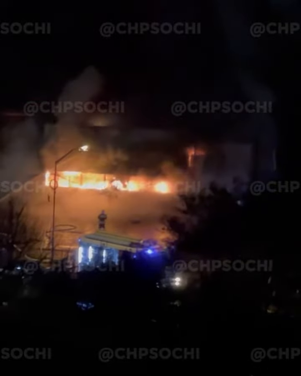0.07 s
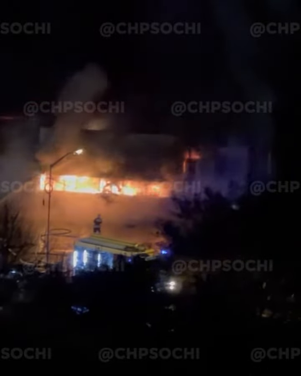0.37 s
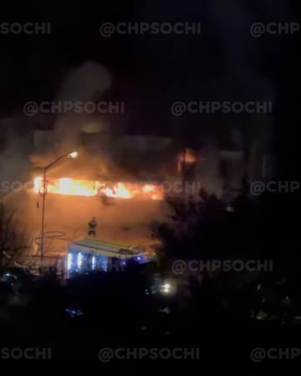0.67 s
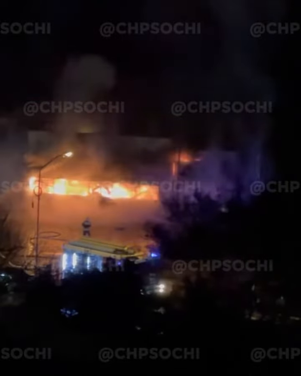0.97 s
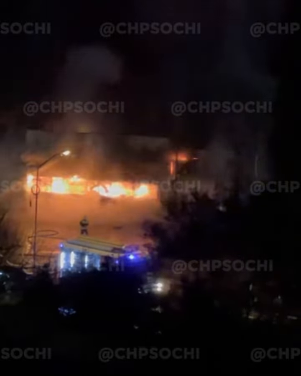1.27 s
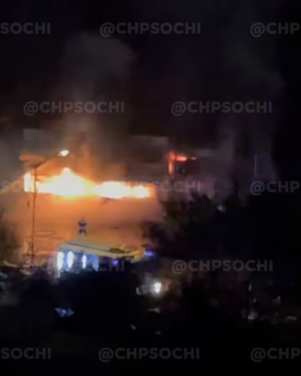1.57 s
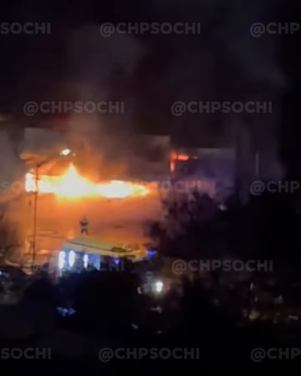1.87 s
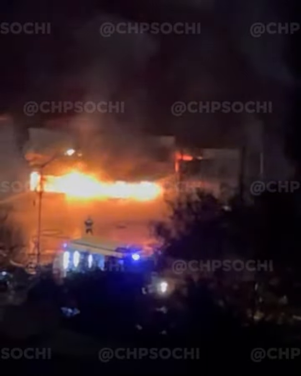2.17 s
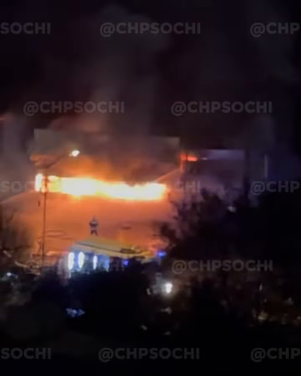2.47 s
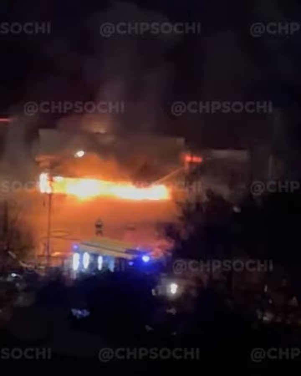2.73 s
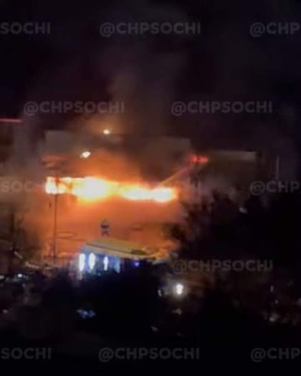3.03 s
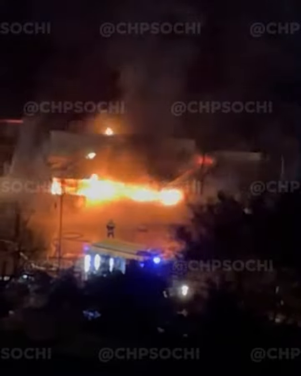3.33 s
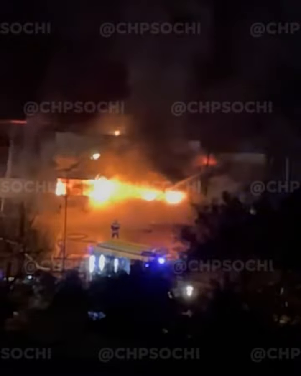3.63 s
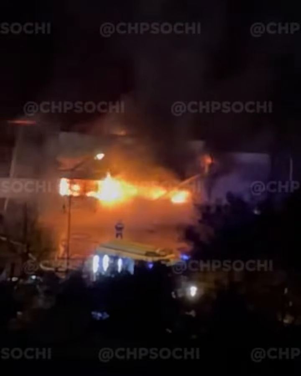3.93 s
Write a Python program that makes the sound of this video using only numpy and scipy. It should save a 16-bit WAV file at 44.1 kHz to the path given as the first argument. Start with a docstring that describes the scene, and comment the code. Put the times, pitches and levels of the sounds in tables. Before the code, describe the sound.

A building fire roars dully throughout, some way off outdoors, with hiss and faint crackle over idling fire engines and a generator's low drone. From about 0.3 to 1.5 seconds, debris snaps among brief rustles, small squeaks and soft hollow knocks. At about 2.6 seconds comes one heavy thump, like a vehicle door, leaving a short low echo. A few faint ticks follow as the roar continues.

```python
"""A building fire at night

Some way off, flames make a dull broadband roar with hiss and faint crackle on top. Two fire engines
idle at nearly the same speed, so their exhaust notes beat; a generator drones beneath them. Debris
snaps, and a few rustles, squeaks and hollow knocks sound, mostly early on. One heavy thump, like a
vehicle door, rings a panel and is reflected by the buildings as a rumble."""
import sys
import numpy as np
from scipy import signal
from scipy.fft import rfft, irfft, next_fast_len
from scipy.io import wavfile
from scipy.ndimage import uniform_filter1d, map_coordinates

SR = 44100
rng = np.random.default_rng(int(sys.argv[2]) if len(sys.argv) > 2 else 0)


def unload_audio(sound):
    """Save the sound as a 16-bit wav file, at the path given as the first command line argument."""
    columns = np.transpose(np.atleast_2d(sound))
    # keep every value between -1 and 1, then stretch to whole-number steps
    steps = np.round(np.clip(columns, -1, 1) * 32767)
    wavfile.write(sys.argv[1], SR, steps.astype(np.int16))


N = 176400

# spectra of the flames' roar and hiss (frequency [Hz], relative density [dB])
ROAR_SPECTRUM = [(150, -17), (300, -3.5), (470, -1.5), (650, 1), (850, -.5), (1150, -3.5), (1600, -4),
                 (2100, -14.5), (3500, -25), (8000, -61.5), (10000, -77)]
HISS_SPECTRUM = [(900, -22.5), (1700, -1.5), (2250, -0.5), (2750, 1.5), (3350, -1.5), (3900, -6),
                 (4900, -10.5), (5400, -10), (6300, -13), (7400, -18), (8200, -31.5), (9500, -32.5)]


def amp(db):
    """Amplitude ratio of a level in decibels."""
    return 10 ** (np.asarray(db) / 20)


def unit(x):
    """Normalisation to rms 1."""
    return x / np.sqrt(np.mean(x ** 2) + 1e-20)


def along(points, hz):
    """Interpolation of (frequency [Hz], value) points on a logarithmic axis."""
    frequencies, values = np.transpose(points)
    return np.interp(np.log(hz + 1), np.log(frequencies + 1), values)


def since(onset):
    """Seconds elapsed since an onset, zero before it."""
    return np.maximum(np.arange(N) / SR - onset, 0)


def curve(rows):
    """Linear interpolation of (time [s], value) rows at every sample."""
    return np.interp(since(0), *np.transpose(rows))


def wobble(rate):
    """Smooth random modulation: a spline through `rate` Gaussian values a second."""
    return map_coordinates(rng.standard_normal(int(N * rate / SR) + 4), [since(0) * rate + 1])


def filtered(x, response):
    """Linear filtering: the spectrum of x is multiplied by a frequency response."""
    size = next_fast_len(N + SR // 2)
    return irfft(rfft(x, size) * response(np.fft.rfftfreq(size, 1 / SR)), size)[..., :N]


def coloured(x, spectrum, tilt=0):
    """Spectral shaping, with an added tilt in dB per octave."""
    return filtered(x, lambda hz: amp(along(spectrum, hz) + tilt * np.log2((hz + 50) / SR)))


def noise(spectrum, tilt=0):
    """Coloured Gaussian noise of rms 1."""
    return unit(coloured(rng.standard_normal(N), spectrum, tilt))


def rush(spectrum, patchy_db):
    """Mid-side stereo noise, modulated in random patches of time and frequency."""
    # stereo width (frequency [Hz], side level over mid [dB])
    width = [(60, -53.5), (120, -64), (300, -32), (500, -13), (900, -9), (1500, -13), (2100, -29.5),
             (4000, -34.5), (4750, 2), (5300, -13.5), (6200, -7.5), (7000, -28), (8000, 22.5)]
    cells = signal.stft(rng.standard_normal((2, N)), nperseg=512)[2]
    patches = uniform_filter1d(rng.standard_normal(cells.shape[1:]), size=5, axis=0)
    patches = uniform_filter1d(patches, size=10, axis=1)
    pair = signal.istft(cells * amp(patchy_db * unit(patches)), nperseg=512)[1][:, :N]
    mid, side = coloured(pair, spectrum)
    side = coloured(side, width)
    return np.array([mid + side, mid - side]) / np.std(mid)


def pops(spectrum, rate, scatter_db):
    """Shot noise of rms 1: filtered random impulses of uneven size, about `rate` a second."""
    impulses = rng.random(N) < rate / SR
    sizes = amp(scatter_db * np.clip(rng.standard_normal(N), -2, 2))
    return unit(coloured(impulses * sizes, spectrum))


def swell(t, rise_s, length):
    """Envelope with a linear rise and a Gaussian decay that reaches 1/e at `length` seconds."""
    return np.minimum(t / rise_s, 1) * np.exp(-(t / length) ** 2)


def attack(t, rise_s):
    """Exponential approach to full amplitude."""
    return 1 - np.exp(-t / rise_s)


def ring(modes, t):
    """Free vibration: a sum of damped modes, t seconds after a blow."""
    return sum(amp(db - 60 * t / t60) * np.sin(2 * np.pi * hz * t) for hz, db, t60 in modes)


def fire(rumble_db=-45.5):
    """Combustion noise: rumble, roar and hiss are three bands that flicker independently."""
    # spectrum of the rumble (frequency [Hz], relative density [dB])
    rumble_spectrum = [(15, -28), (33, -12), (48, 2.5), (80, -0.5), (115, 5.5), (145, 4.5), (172, 1.5),
                       (200, -1.5), (240, -3), (305, 1), (360, -14), (600, -33.5), (3000, -91.5)]
    # envelopes of the roar and the hiss (time [s], level [dB])
    roar_level = [(0, -41), (.14, -41.5), (.4, -42), (.6, -44), (.85, -44.5), (1.2, -43), (1.5, -45.5),
                  (2.04, -45.5), (2.13, -41.5), (2.27, -43), (2.8, -44), (3.4, -45.5), (3.54, -43),
                  (3.7, -42.5), (4, -47.5)]
    hiss_level = [(0, -47.5), (.28, -46), (.55, -47), (.85, -50), (1.2, -48), (1.7, -51.5), (2.15, -48),
                  (2.45, -51), (2.68, -49), (2.8, -45.5), (2.95, -50), (3.4, -50), (3.6, -49), (4, -52.5)]
    rumble = amp(rumble_db + 0.54 * wobble(3.3)) * rush(rumble_spectrum, patchy_db=0.9)
    roar = amp(curve(roar_level) + 0.42 * wobble(13)) * rush(ROAR_SPECTRUM, patchy_db=1.18)
    hiss = amp(curve(hiss_level) + 0.64 * wobble(25.48)) * rush(HISS_SPECTRUM, patchy_db=1.55)
    return rumble + roar + hiss


def crackle(fine_db=-59, coarse_db=-55):
    """Shot noise of the fire: tiny bright pops in the hiss and duller ones in the roar."""
    fine = amp(fine_db) * pops(HISS_SPECTRUM, rate=90, scatter_db=2.5)
    coarse = amp(coarse_db) * pops(ROAR_SPECTRUM, rate=45, scatter_db=3)
    return fine + coarse


def engines(in_step_s=0.2, drift_rad=0.087, flutter_db=0.89):
    """Beats: two harmonic exhaust notes interfere at the difference of their firing rates."""
    # idling engines (firing rate [Hz], level of the fundamental [dB], fall per overtone [dB])
    exhausts = [(64.55, -39.5, 9), (67.8, -57, 11)]
    out, t = np.zeros(N), since(0)
    for hz, db, fall_db in exhausts:
        phase = 2 * np.pi * hz * (t - in_step_s) + drift_rad * wobble(3.4)
        for overtone in range(3):
            level = db - fall_db * overtone + flutter_db * (overtone + 1.5) * wobble(9)
            out += amp(level) * np.cos((overtone + 1) * phase + overtone * np.pi)
    return np.sqrt(2) * out


def generator(flutter_db=0.99, drift_rad=0.68):
    """A line spectrum whose partials waver under slow amplitude and phase modulation."""
    # partials of the drone (frequency [Hz], level [dB])
    partials = [(50, -67), (100, -57), (150.2, -51.5), (300, -58.5), (408, -62), (500, -67.5)]
    out, t = np.zeros(N), since(0)
    for hz, db in partials:
        gain = amp(db + flutter_db * wobble(3.927))
        out += gain * np.sin(2 * np.pi * hz * t + drift_rad * wobble(3.07))
    return np.sqrt(2) * out


def rustles(grain_db=1):
    """Short scuffs: noise bursts made grainy by fast amplitude modulation."""
    # scuffs (time [s], level [dB], length [s], tilt [dB/octave])
    scuffs = [(0.251, -43, 0.04, -1.5), (0.376, -33.5, 0.024, -3.5), (0.399, -39.5, 0.063, -0.5),
              (0.464, -43, 0.042, 4), (0.5, -51.5, 0.047, 2.5), (0.909, -55, 0.12, 7),
              (1.121, -49, 0.04, 5.5), (1.294, -58, 0.044, 9), (1.465, -45, 0.04, -2.5),
              (3.357, -54, 0.054, 25)]
    # spectrum of a scuff (frequency [Hz], relative density [dB])
    spectrum = [(300, 3.5), (800, -8), (1900, -7.5), (2600, -4.5), (3150, 5), (3900, -6), (4800, -9),
                (5700, -2), (6600, -18), (7400, -13), (8300, -30.5), (9500, -56.5)]
    out = np.zeros(N)
    for onset, db, length, tilt in scuffs:
        out += amp(db) * swell(since(onset), 0.00636, length) * noise(spectrum, tilt)
    return out * unit(amp(grain_db * wobble(400)))


def snaps(t60_s=0.029):
    """Fracture: burning debris breaks in dry, quickly damped broadband transients."""
    # cracks (time [s], level [dB], tilt [dB/octave])
    cracks = [(0.253, -34, -5.5), (0.312, -41.5, -3), (.385, -29.5, -2), (0.4, -29, -2), (.410, -29, -1.5),
              (0.448, -41.5, -3), (0.473, -31, 1), (.54, -43, 0), (.657, -39, -6), (.753, -40, -4),
              (0.917, -43, 0), (.95, -44, 0), (.975, -38.5, -3), (1.139, -38, 1), (1.292, -43, -5),
              (1.464, -39.5, -3), (3.166, -40, -2), (3.703, -41.5, 1)]
    # spectrum of a crack (frequency [Hz], relative density [dB])
    spectrum = [(400, -10), (1200, -7.5), (2200, -1.5), (3200, 5.5), (4000, -2.5), (4800, -9), (5800, -5.5),
                (7400, -12.5), (9500, -45)]
    out = np.zeros(N)
    for onset, db, tilt in cracks:
        t = since(onset)
        out += amp(db - 60 * t / t60_s) * attack(t, rise_s=0.00065) * noise(spectrum, tilt)
    return out


def squeaks(rough_rad=0.65, flutter_db=3):
    """Whistles, as of wet burning wood or strained metal, roughened by phase and amplitude modulation."""
    # whistles (time [s], frequency [Hz], level [dB], length [s], glide [octaves/s])
    whistles = [(.313, 6800, -44.5, 0.0083, 0), (0.395, 7200, -42.5, .008, 0),
                (0.402, 3095, -43, 0.018, -4), (0.452, 3100, -45, 0.02, -2),
                (0.475, 3130, -41, 0.034, -4.5), (.472, 4010, -40, 0.0058, -4),
                (0.475, 5886, -50, 0.033, 2.5), (.53, 2830, -48, 0.038, -1),
                (0.654, 2096, -44.5, 0.032, 0.5), (0.715, 5570, -49.5, 0.01, 1), (.912, 5620, -55, .02, -1),
                (0.935, 4487, -52, 0.035, 0), (0.97, 1668, -45, 0.043, 0), (1.136, 5280, -49, 0.0332, -0.5),
                (1.292, 2710, -46, 0.035, 0.5), (1.334, 6610, -53.5, 0.0148, 2),
                (1.478, 2650, -46, 0.035, -1.5), (1.54, 2586, -53, 0.068, 0)]
    out = np.zeros(N)
    for onset, hz, db, length, glide in whistles:
        t = since(onset)[:round((onset + 0.25) * SR)]
        waver = np.interp(t, np.arange(128) / 400, rng.standard_normal(128))
        phase = 2 * np.pi * np.cumsum(hz * 2 ** (glide * t)) / SR + rough_rad * waver
        out[:len(t)] += amp(db) * swell(t, 0.0049, length) * np.sin(phase)
    return np.sqrt(2) * out * unit(amp(flutter_db * wobble(300)))


def flares():
    """Combustion noise surges briefly in the midrange as the flames flare up."""
    # flare-ups (time [s], level [dB], length [s])
    surges = [(0.37, -44, 0.057), (0.682, -48, 0.064), (2.09, -44, 0.1), (3.496, -42.5, 0.087)]
    # spectrum of a flare-up (frequency [Hz], relative density [dB])
    spectrum = [(300, -31), (600, 2), (850, -3), (1100, -3), (1600, -17.5), (3000, -39)]
    envelope = sum(amp(db) * swell(since(onset), 0.015, length) for onset, db, length in surges)
    return envelope * rush(spectrum, patchy_db=5)


def knocks(tail_db=-3, tail_t60_s=0.46):
    """Resonance: soft blows excite a distant hollow body, with a short outdoor reverberation."""
    # blows (time [s], level [dB])
    blows = [(.658, -40), (.668, -34), (.70, -39), (.731, -43.5), (1.174, -42)]
    # modes of the body (frequency [Hz], relative level [dB], T60 [s])
    modes = [(205, -13.5, 0.43), (244, -9.5, 0.28), (304.6, 2.5, 0.15)]
    # spectrum of the reverberation (frequency [Hz], relative density [dB])
    tail_spectrum = [(90, -17), (170, 4.5), (230, 5), (315, -6.5), (370, -14.5), (900, -22), (3000, -66.5)]
    out = np.zeros(N)
    for onset, db in blows:
        t = since(onset)
        tail = amp(tail_db - 60 * t / tail_t60_s) * noise(tail_spectrum)
        out += amp(db) * attack(t, rise_s=0.0064) * (ring(modes, t) + tail)
    return out


def thumps(thud_t60_s=0.14, echo_db=-15, echo_delay_s=0.071, echo_t60_s=1.53):
    """Impact and reflection: each blow thuds and rings a panel; the buildings return a low rumble."""
    # one light blow, then the cluster of the heavy thump (time [s], level [dB], tilt [dB/octave])
    blows = [(1.14, -40, 4), (2.545, -30, 3), (2.551, -26.5, 2), (2.561, -24, .5), (2.571, -25, 1),
             (2.607, -31.5, 1.5), (2.716, -33, -6), (2.801, -35.5, -6)]
    # modes of the panel (frequency [Hz], relative level [dB], T60 [s])
    modes = [(193.3, -3, 0.2), (334, -7, 0.15), (407.3, -11.5, 0.21), (643, -8.5, 0.17)]
    # spectra of the thud and its echo (frequency [Hz], relative density [dB])
    thud_spectrum = [(30, -30.5), (70, -7), (110, -0.5), (160, 1.5), (250, -4), (400, -8), (500, -9.5),
                     (680, -8.5), (1100, -16.5), (1600, -20.5), (2200, -28), (3100, -23.5), (4300, -36),
                     (6000, -40), (8000, -61), (10000, -90)]
    echo_spectrum = [(22, -23), (33, -11), (43, 4), (52, 3), (70, -4.5), (100, -4.5), (140, 4),
                     (240, -18.5), (320, -1.5), (480, -19.5), (800, -27.5), (3000, -36), (8000, -49),
                     (10000, -70.5)]
    direct, echo_power = np.zeros(N), np.zeros(N)
    for onset, db, tilt in blows:
        t, late = since(onset), since(onset + echo_delay_s)
        thud = amp(-60 * t / thud_t60_s) * noise(thud_spectrum, tilt)
        direct += amp(db) * attack(t, rise_s=0.00162) * (ring(modes, t) + thud)
        # incoherent reflections add in power
        echo_power += amp(db + echo_db - 60 * late / echo_t60_s) ** 2 * attack(late, rise_s=0.024)
    return direct + np.sqrt(echo_power) * noise(echo_spectrum)


def air_push(centre_s=2.567, hz=127.7, db=-20.5, half_length_s=0.011):
    """Air displaced by the heaviest blow radiates one low pressure pulse with a Gaussian envelope."""
    t = since(0) - centre_s
    return -amp(db) * np.sin(2 * np.pi * hz * t) * np.exp(-(t / half_length_s) ** 2)


def tick(onset_s=3.021, db=-39, t60_s=0.066):
    """One thin, bright tick close by: a noise transient with exponential decay."""
    # spectrum of the tick (frequency [Hz], relative density [dB])
    spectrum = [(1000, -12), (3000, 0), (6500, -3), (8500, -6), (11500, 2)]
    t = since(onset_s)
    return amp(db - 60 * t / t60_s) * attack(t, rise_s=0.0011) * noise(spectrum)


def scene():
    """Superposition: the wide fire lies behind the central sources."""
    background = fire() + flares() + crackle() + tick() + engines() + generator()
    return background + rustles() + snaps() + squeaks() + knocks() + thumps() + air_push()


def record(dry, mono_below_hz=390, treble_hz=8200, leak_db=-23.5, top_hz=12000):
    """Level and phase differences at a microphone pair favour the left midrange; treble is cut."""
    # imbalance of the pair (frequency [Hz], left over right [dB])
    lean = [(230, -2), (360, 7), (550, 2), (860, 8), (1350, 5.5), (1700, 0.5), (2100, 0)]
    # phase difference of the pair (frequency [Hz], left lead [rad])
    lead = [(230, 0.019), (450, 0.7), (860, 0.56), (1250, 0.41), (2000, 0.091)]

    def response(hz):
        # each channel takes half of both differences, which fade out in the bass
        share = np.array([[1], [-1]]) / 2 * hz ** 4 / (hz ** 4 + mono_below_hz ** 4)
        pair = amp(share * along(lean, hz)) * np.exp(1j * share * along(lead, hz))
        lowpass = 1 / np.sqrt(1 + (hz / treble_hz) ** 80)
        return pair * (lowpass + amp(leak_db)) * (hz < top_hz)
    return filtered(dry, response)


dry = scene()
out = record(dry)
unload_audio(out)
```